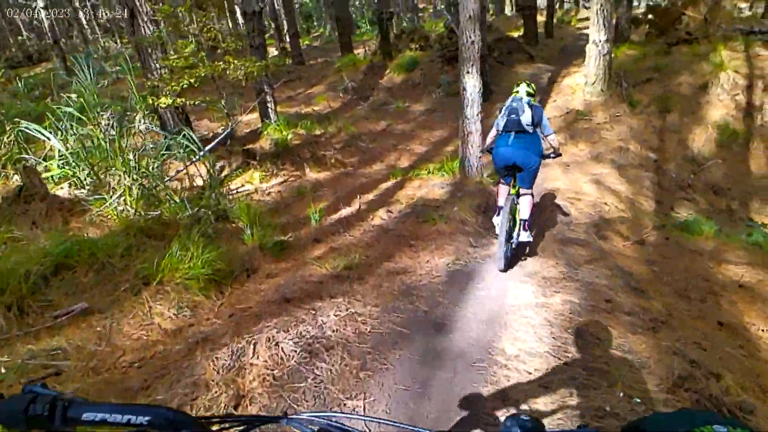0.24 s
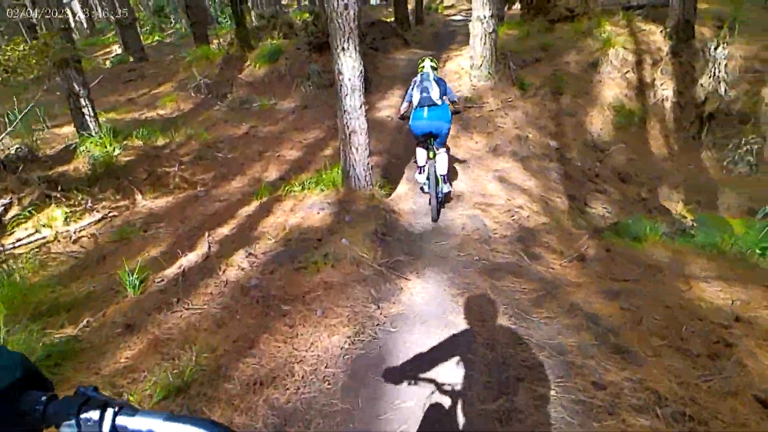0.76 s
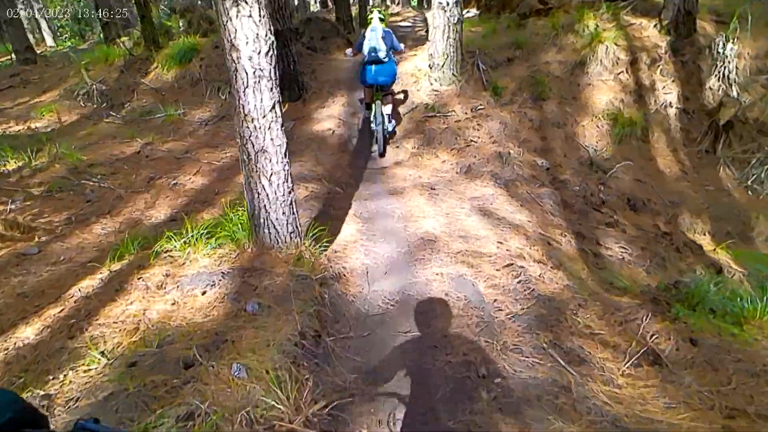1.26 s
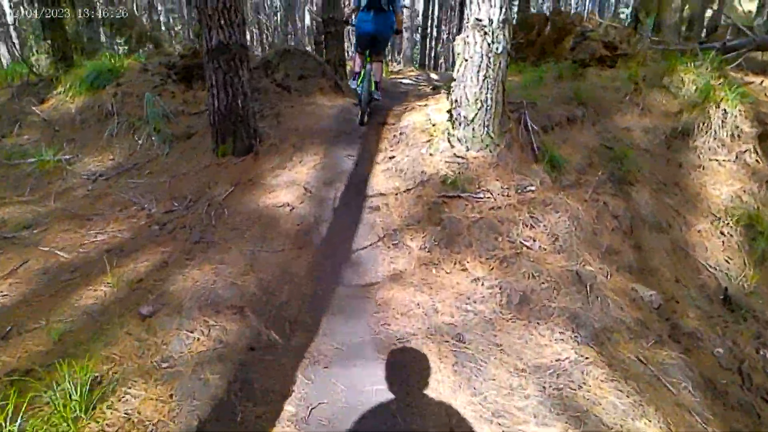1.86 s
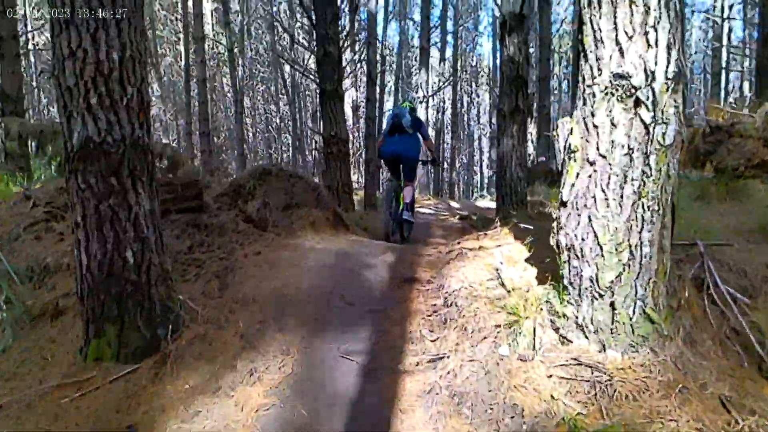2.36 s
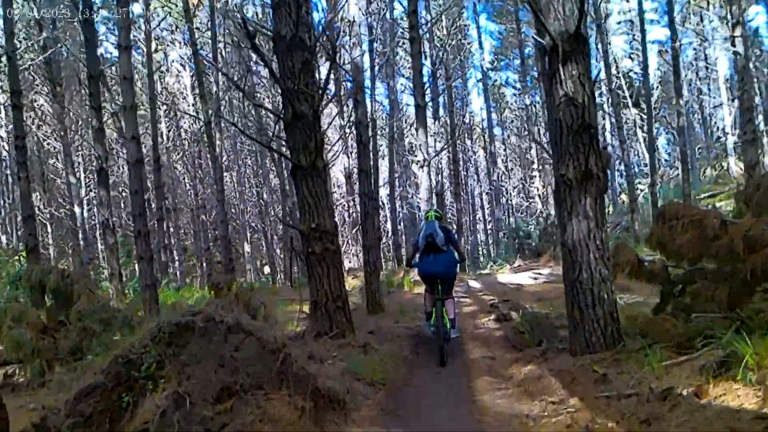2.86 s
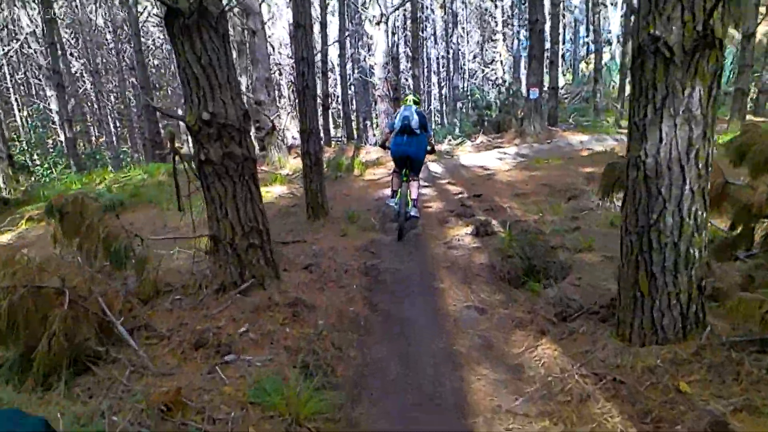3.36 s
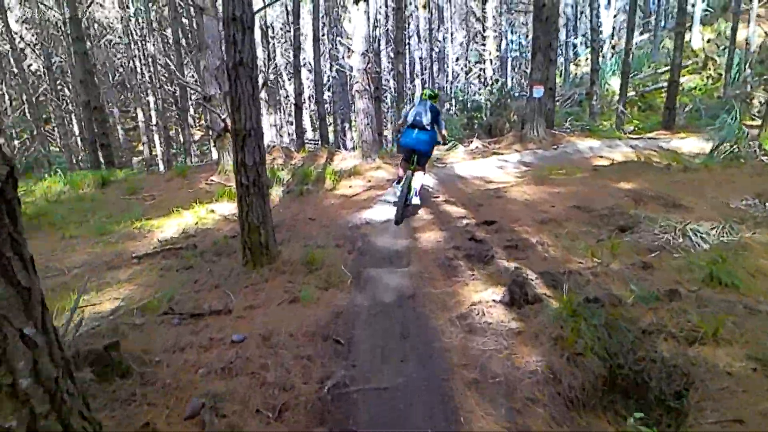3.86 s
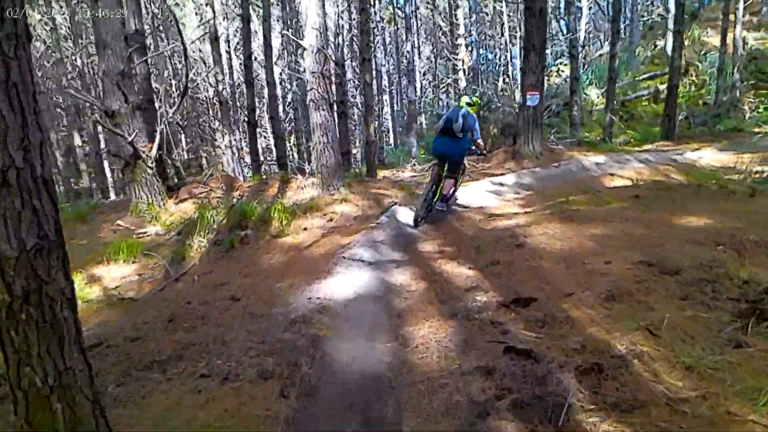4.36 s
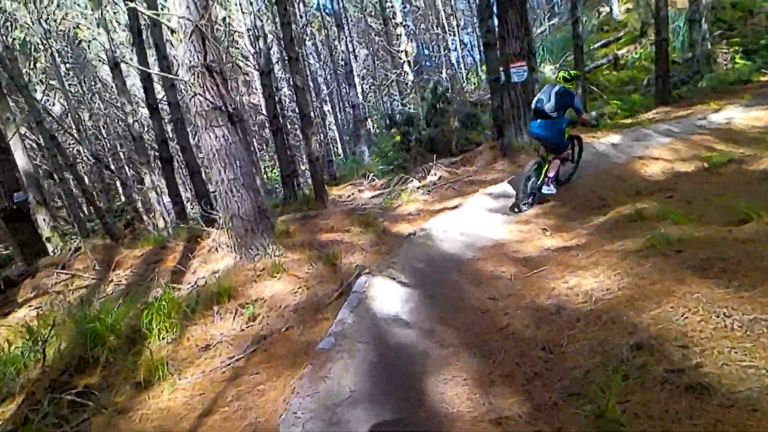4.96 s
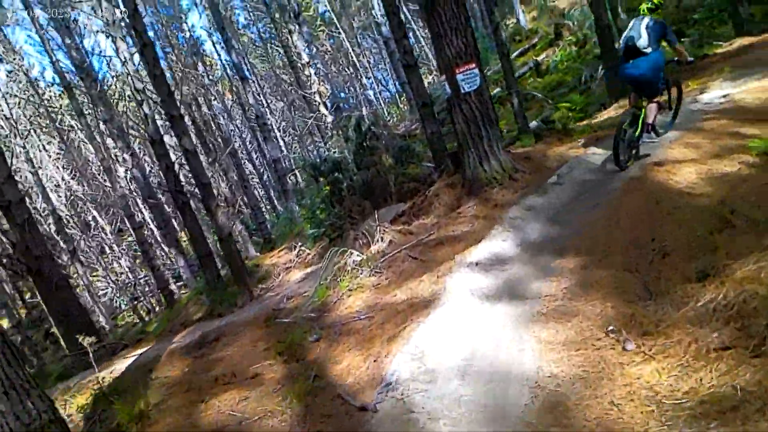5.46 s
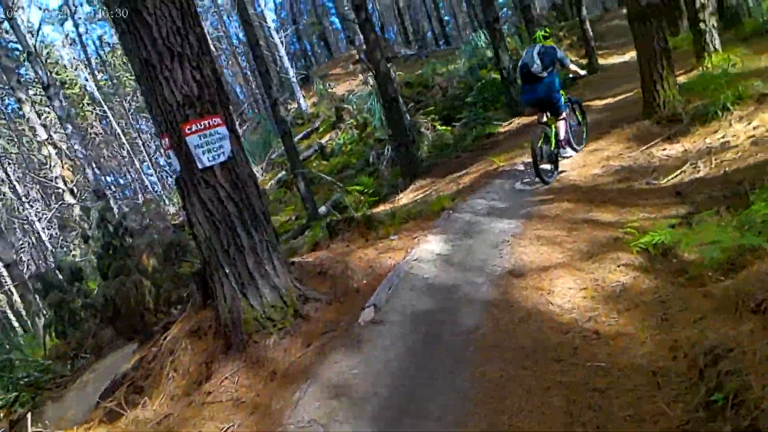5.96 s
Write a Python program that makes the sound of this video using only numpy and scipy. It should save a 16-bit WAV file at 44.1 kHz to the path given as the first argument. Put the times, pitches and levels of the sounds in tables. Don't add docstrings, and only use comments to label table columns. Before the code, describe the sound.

Heard from inside a closed camera housing carried by a mountain biker on a dirt trail. Low, muffled bumps and knocks come irregularly, build to a cluster of heavy thuds and one overloaded slam before the middle, then thin out. Later there are soft rolling rumbles and more loose-part ticks. Faint boxy tyre roar, hiss and electronic buzz stay underneath.

```python
import sys
import numpy as np
from scipy import signal
from scipy.io import wavfile

SR = 44100
rng = np.random.default_rng(int(sys.argv[2]) if len(sys.argv) > 2 else 0)


def gain_from_db(level_db):
    decades = np.asarray(level_db, float) / 20
    return 10 ** decades


def file_out(sig):
    cols = np.atleast_2d(sig).T
    lim = np.clip(cols, -1, 1)
    pcm = np.round(lim * 32767).astype(np.int16)
    wavfile.write(sys.argv[1], SR, pcm)


N = 273861

# start in seconds, peak in dB, pitch in Hz, cycles to the peak,
# pitch sag (1 = none).
THUDS = [(1.4552, -9.5, 86.3, 0.64, 0.93), (1.7176, -3.1, 89.9, 0.61, 0.92),
         (2.1997, 6.1, 109.4, 0.59, 0.79), (2.3887, 20.2, 127.4, 0.43, 0.62),
         (2.5958, 3.6, 121.8, 0.51, 0.69), (2.7704, -20.9, 83.7, 0.41, 1.2),
         (3.9178, -3.0, 88.9, 0.58, 0.86), (5.0187, -16.8, 73.5, 0.72, 1.12),
         (5.2025, -26.0, 56.0, 0.65, 1.0), (5.427, -32.0, 90.0, 0.6, 1.0),
         (5.3811, -27.0, 167.2, 0.73, 0.65), (5.5642, -28.3, 91.5, 0.52, 1.01)]
# start in seconds, peak in dB, pitch in Hz, cycles to the
SHAPED_KNOCKS = [(1.6706, -31.0, 186.6, 2.01, 1.16), (1.6903, -23.8, 229.3, 1.6, 0.71),
                 (1.9564, -19.5, 164.7, 0.99, 0.6), (2.1967, -14.0, 395.0, 2.01, 0.86),
                 (2.2146, -16.9, 134.5, 0.51, 0.5), (2.3828, -10.2, 198.8, 2.01, 0.57),
                 (2.3887, 7.8, 717.4, 2.01, 0.64), (2.4002, -18.9, 101.7, 0.94, 1.07),
                 (2.5905, -22.6, 146.6, 1.15, 1.31), (2.6088, -20.7, 102.3, 0.4, 1.31),
                 (3.4472, -18.4, 205.8, 1.56, 0.93), (3.4515, -22.4, 1200.0, 1.08, 0.45),
                 (3.4543, -16.7, 432.2, 1.57, 0.54)]
# start in seconds, peak in dB, pitch in Hz.
BUMPS = [(0.2014, -19.0, 32.5), (0.3917, -14.5, 33.9), (0.5872, -25.8, 28.0), (0.8249, -24.5, 33.0),
         (1.1808, -26.0, 28.8), (1.3916, -24.6, 23.1), (1.6783, -13.1, 30.0), (1.9505, -12.1, 28.2),
         (2.1043, -19.6, 27.1), (2.323, -12.5, 26.1), (2.5271, -11.7, 23.4), (2.9246, -22.3, 21.3),
         (3.2268, -31.1, 23.4), (3.4474, -7.6, 31.5), (4.0544, -15.3, 27.5), (5.1317, -13.9, 23.7)]
# start in seconds, peak in dB, pitch in Hz.
DIPS = [
    (-0.0123, -34.9, 17.0),
    (2.71, -27.0, 16.3),
    (4.7457, -19.3, 26.8),
]
# start in seconds, peak in dB, pitch in Hz.
ROLLS = [
    (4.115, -28.0, 14.4),
    (4.235, -24.3, 14.7),
    (4.3319, -24.4, 18.1),
    (4.445, -25.0, 12.5),
    (4.585, -25.5, 14.4),
    (4.855, -24.2, 14.1),
    (5.1857, -25.3, 14.4),
]
# start in seconds, peak in dB, pitch in Hz, cycles to the peak.
KNOCKS = [(0.1992, -23.3, 152.2, 0.4), (0.3928, -20.5, 172.6, 0.7), (0.8276, -26.8, 211.9, 0.72),
          (0.9574, -27.4, 124.6, 0.48), (0.9677, -30.1, 107.2, 0.66), (1.6805, -21.6, 110.6, 0.82),
          (2.3312, -24.8, 251.7, 1.17), (2.532, -21.1, 121.8, 1.57), (2.9827, -29.8, 93.1, 0.75),
          (4.0611, -26.4, 136.5, 0.4), (4.62, -31, 150, 0.7), (4.8125, -27, 95, 0.8),
          (5.136, -27.2, 135.1, 1.37)]
# start in seconds, peak in dB, length in seconds.
CRUNCHES = [(0.957, -36, 0.033), (1.448, -28, 0.015), (1.669, -25, 0.023), (1.719, -23, 0.0061),
            (2.204, -21, 0.0073), (2.216, -35, 0.011), (2.418, -28, 0.0054), (2.608, -25.5, 0.008),
            (2.773, -35, 0.022), (2.981, -32, 0.0088), (3.222, -38.5, 0.016), (3.359, -32, 0.023),
            (3.91, -29, 0.016), (4.578, -29, 0.0084), (4.642, -27.5, 0.0046), (4.812, -32.5, 0.01),
            (4.963, -27, 0.0063), (5.02, -33.5, 0.0091), (5.186, -39, 0.015), (5.379, -49, 0.031),
            (5.55, -41.5, 0.024)]
# time in seconds, level in dB.
ROUGHNESS = [(0.0, -51.5), (0.28, -48.5), (0.67, -51.5), (0.88, -53.5), (1.49, -48.5), (1.59, -51.5),
             (2.06, -45.5), (2.35, -43), (2.51, -44), (3.06, -52), (3.49, -48.5), (3.77, -49), (3.99, -46),
             (5.22, -43.5), (5.84, -47.5), (6.21, -50)]
# start in seconds, peak in dB, ring in Hz, upper mode in dB.
RATTLES = [(0.816, -43, 1310, 0), (0.835, -42, 1190, -17), (1.007, -38.5, 1350, -10),
           (1.056, -39, 1330, -9), (1.49, -34, 1230, -5), (1.671, -40.5, 1270, -5), (1.722, -36, 1020, -13),
           (1.997, -38.5, 1060, -2), (2.386, -24, 900, -10), (2.883, -38, 1200, -5),
           (3.273, -40.5, 1270, -2), (3.3247, -37, 1280, -5), (3.385, -43, 1010, 1), (3.451, -33, 902, -1),
           (4.2412, -39.5, 1170, -3), (4.3316, -39.5, 1030, 13), (4.4475, -39.5, 1250, 5),
           (4.58, -35, 1230, 6), (4.645, -27.5, 1060, -6), (4.669, -40.5, 1450, -1), (4.72, -34, 1280, -2),
           (4.7324, -38, 1000, 6), (4.758, -41, 1220, 7), (4.796, -36, 1270, -3), (4.962, -30, 1220, -1),
           (4.972, -34, 1460, 3), (4.99, -37, 980, -1), (5.026, -36.5, 970, -13), (5.1197, -36.5, 1260, 0),
           (5.244, -42, 1010, -6)]
# first tick in seconds, gap in seconds, number of ticks.
BOUNCES = [(0.2, 0.195, 2), (0.982, 0.1, 1), (1.094, 0.037, 2), (1.927, 0.118, 2), (2.401, 0.132, 2),
           (2.872, 0.103, 2), (3.49, 0.051, 3), (4.273, 0.046, 4), (4.593, 0.011, 3), (4.655, 0.035, 2),
           (4.822, 0.026, 4), (5.006, 0.027, 4)]
# start in seconds, peak in dB.
SNAPS = [
    (4.645, -54),
    (1.493, -37),
    (2.885, -46),
    (3.449, -52),
    (4.243, -48),
    (4.576, -42.5),
    (4.958, -42),
]
# time in seconds, level in dB.
TYRES = [(0.0, -60.5), (0.45, -59.5), (0.76, -59.5), (1.04, -58.5), (2.84, -58), (3.04, -58.5),
         (3.44, -58.5), (3.63, -60.5), (3.89, -60.5), (4.22, -58.5), (4.64, -58.5), (4.77, -56.5),
         (4.93, -59), (5.05, -58.5), (5.34, -59.5), (5.83, -57), (6.21, -58)]
# centre in Hz, width in Hz, gain in dB.
HOUSING = [(660, 1030, 16), (1000, 130, -14), (1270, 77, 11.5), (1590, 260, 13), (1808, 230, 10),
           (1970, 1100, -1), (2520, 70, 7), (3270, 630, 0.5), (4150, 210, 8.5), (4910, 180, 5.5),
           (5600, 660, -15), (6720, 320, 4), (8650, 180, -24)]
# pitch in Hz, level in dB rms.
BUZZ = [(180, -66), (300, -64), (420, -68.5), (540, -71), (660, -104), (780, -93), (900, -86),
        (1020, -74.5)]

TYPICAL_DB, TYPICAL_HZ = -15, 27
RISE_CYCLES, RISE_PER_DB = .645, -.015
SAG, SAG_PER_DB, SAG_PITCH_POWER = .69, .005, .6
ROLL_CYCLES = .6
KNOCK_STEADY_HZ, KNOCK_SAG_POWER = 125, .7
CRUNCH_DB, CRUNCH_LEAD_S, CRUNCH_S = -15.5, 0.00385, 0.015
SHIVER_S, SHIVER_FOLLOWS = 0.019, 0.84
SHIVER_RUMBLE_DB, SHIVER_JUDDER_DB = -40, -57.5
SWAY_DB, RUMBLE_DB, JUDDER_DB = 8, 0, -10.0
JUDDER_FOLLOWS = 0.32
BOUNCE_DB, BOUNCE_HZ, BOUNCE_UPPER_DB, CHATTER_S = -44, 1250, -7, 0.0091
HISS_DB = -66.5
OVERLOAD, CUTOFF_HZ = .708, 15750


def rms_one(x):
    return x / np.sqrt(np.mean(x ** 2) + 1e-20)


def in_time(rows):
    s, *columns = np.transpose(rows)
    return [np.interp(np.arange(N) / SR, s, c) for c in columns]


def band(x, low_hz, high_hz, order=2):
    return signal.sosfilt(signal.butter(order, [low_hz, high_hz], "band", fs=SR, output="sos"), x)


def drift(rate):
    r = np.exp(-80 * np.pi * rate / SR)
    noise = rng.standard_normal(N // 40 + 2002)
    slow = signal.lfilter([1], [1, -2 * r, r * r], noise)[2000:]
    return np.interp(np.arange(N) / 40, np.arange(len(slow)), rms_one(slow))


def resonance(x, hz, width_hz):
    r = np.exp(-np.pi * width_hz / SR)
    poles = [1, -2 * r * np.cos(2 * np.pi * hz / SR), r * r]
    return signal.lfilter(np.array([1, 0, -1]) * (1 - r * r) / 2, poles, x + 1e-18)


def swings(rows):
    out = np.zeros(N)
    for s, db, hz, swell, sag in rows:
        end = s + 11 * swell / hz
        at = np.arange(max(int(s * SR), 0), min(int(end * SR), N))
        cycles = np.maximum(at / SR - s, 0) * hz
        envelope = (cycles / swell) ** 2 * np.exp(2 - 2 * cycles / swell)
        out[at] += gain_from_db(db) * envelope * np.sin(2 * np.pi * cycles ** sag)
    return out


def thuds():
    return swings(THUDS)


def heaves():
    rows = [(s, db, hz, ROLL_CYCLES, 1) for s, db, hz in ROLLS]
    for s, db, hz in BUMPS + DIPS:
        harder_db = db - TYPICAL_DB
        rise = RISE_CYCLES + RISE_PER_DB * harder_db
        sag = SAG * (TYPICAL_HZ / hz) ** SAG_PITCH_POWER + SAG_PER_DB * harder_db
        rows.append((s, db, hz, rise, sag))
    return swings(rows)


def knocks():
    plain = [(s, db, hz, swell, (KNOCK_STEADY_HZ / hz) ** KNOCK_SAG_POWER) for s, db, hz, swell in KNOCKS]
    return swings(plain + SHAPED_KNOCKS)


def crunches():
    out, span = np.zeros(N), int(.1 * SR)
    t = np.arange(span) / SR
    rows = CRUNCHES + [(s - CRUNCH_LEAD_S, db + CRUNCH_DB, CRUNCH_S) for s, db, _ in BUMPS]
    for (s, db, length), noise in zip(rows, rng.standard_normal((len(rows), span))):
        age = t / np.clip(length, .003, .03)
        puff = band(np.cumsum(noise), 130, 910) * age * np.exp(-1.6 * age)
        at = int(s * SR)
        out[at:at + span] += gain_from_db(db - 4.0) * puff / np.abs(puff).max()
    return out


def shiver():
    t = np.arange(N) / SR
    out = np.zeros(N)
    for s, db, _ in BUMPS:
        age = np.maximum(t - s, 0) / SHIVER_S
        out += gain_from_db(SHIVER_FOLLOWS * (db - TYPICAL_DB)) * age * np.exp(1 - age)
    return out


def shaking():
    rough_db, = in_time(ROUGHNESS)
    calm_db = rough_db.mean() + JUDDER_FOLLOWS * (rough_db - rough_db.mean())
    after = shiver()
    brown = signal.lfilter([1], [1, -.995], rng.standard_normal((3, N)))
    lumps = drift(14.0)
    rumble_level = (gain_from_db(rough_db + RUMBLE_DB) + gain_from_db(SHIVER_RUMBLE_DB) * after) * gain_from_db(1.5 * lumps)
    judder_level = (gain_from_db(calm_db + JUDDER_DB) + gain_from_db(SHIVER_JUDDER_DB) * after) * gain_from_db(1.2 * lumps)
    sway = gain_from_db(rough_db + SWAY_DB) * rms_one(band(brown[0], 5.1, 23.2, order=3))
    rumble = rumble_level * rms_one(band(brown[1], 50, 200))
    judder = judder_level * rms_one(band(brown[2], 200, 800))
    return sway + rumble + judder


def rattles():
    out, span = np.zeros(N), int(.08 * SR)
    t = np.arange(span) / SR
    light = [s + gap * k for s, gap, touches in BOUNCES for k in range(touches)]
    scatter = rng.standard_normal((len(light), 3)) * [1.5, .08, 4]
    ticks = RATTLES + [(s, BOUNCE_DB + db, BOUNCE_HZ * (1 + share), BOUNCE_UPPER_DB + upper_db)
                       for s, (db, share, upper_db) in zip(light, scatter)]
    shape = (len(ticks), span)
    grit = rng.standard_normal(shape) * (rng.random(shape) < .045)
    fade = np.minimum(.5 + t / .002, 1) * np.exp(-t / CHATTER_S)
    for (s, db, hz, upper_db), clicks in zip(ticks, grit):
        chatter = (clicks + 4.5 * (t == 0)) * fade
        dull = band(chatter, 550, 3600)
        ring = resonance(dull, hz, 170) - gain_from_db(upper_db) * resonance(dull, 1820, 380)
        at = int(s * SR)
        out[at:at + span] += gain_from_db(db) * ring / np.abs(ring).max()
    return out


def snaps():
    out, span = np.zeros(N), int(.04 * SR)
    fade = np.exp(-np.arange(span) / SR / .004)
    for (s, db), noise in zip(SNAPS, rng.standard_normal((len(SNAPS), span))):
        burst = noise * fade
        crack = resonance(burst, 4260, 850) + 0.19 * band(burst, 2400, 6700)
        at = int(s * SR)
        out[at:at + span] += gain_from_db(db) * crack / np.abs(crack).max()
    return out


def housing(paths):
    out = np.zeros(N)
    for k, (hz, width, db) in enumerate(HOUSING):
        peak = resonance(paths[k % 2], hz, width)
        out += gain_from_db(db) * resonance(peak, hz, 2.5 * width)
    return out


def tyres():
    level_db, = in_time(TYRES)
    sizes = gain_from_db(3 * np.minimum(rng.exponential(1, N), 4))
    grains = rng.standard_normal((2, N)) * sizes * (rng.random(N) < 1500 / SR)
    roar = rng.standard_normal((2, N)) + 1.17 * rms_one(grains)
    wander_db = .8 * drift(9.0) + drift(30.0)
    return gain_from_db(level_db + 1.5 + wander_db) * rms_one(housing(roar))


def electronics():
    t = np.arange(N) / SR
    buzz = sum(np.sqrt(2) * gain_from_db(db) * np.sin(2 * np.pi * (hz * t + rng.random())) for hz, db in BUZZ)
    pulse = 1 + .3 * (t * 60 % 1 < .1) + .2 * ((t * 60 + .45) % 1 < .1)
    return gain_from_db(HISS_DB + 7.0) * pulse * rng.standard_normal(N) + buzz


def scene():
    jolts = thuds() - heaves() - knocks() + crunches()
    return (jolts + shaking() + rattles() + snaps() + tyres() + electronics())[None]


def band_limit(x):
    return signal.sosfilt(signal.butter(12, 16970, fs=SR, output="sos"), x)


def record(dry):
    cut = signal.sosfilt(signal.ellip(10, .3, 60, CUTOFF_HZ, fs=SR, output="sos"), dry)
    knee = np.where(cut > 0, 120, 30)
    flattened = cut / (1 + np.abs(cut / OVERLOAD) ** knee) ** (1 / knee)
    return band_limit(flattened)


dry = scene()
out = record(dry)
file_out(out)
```